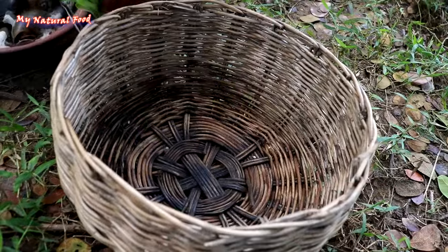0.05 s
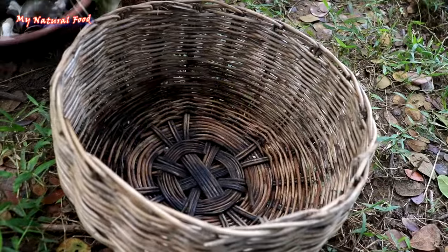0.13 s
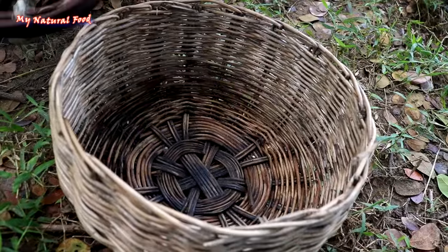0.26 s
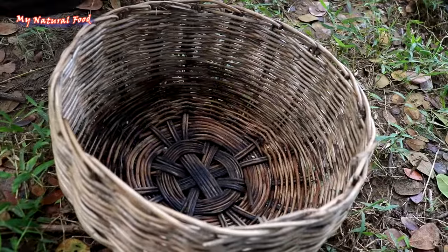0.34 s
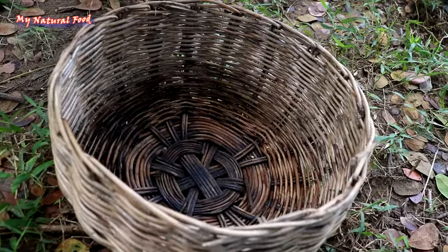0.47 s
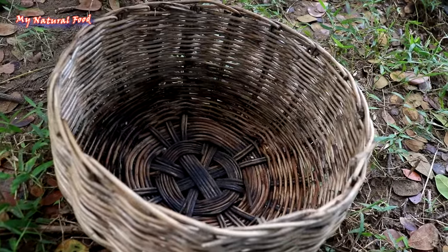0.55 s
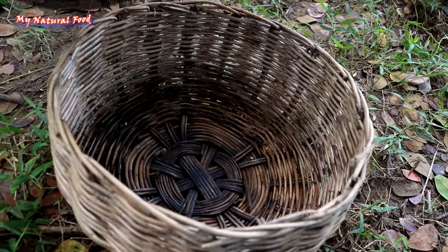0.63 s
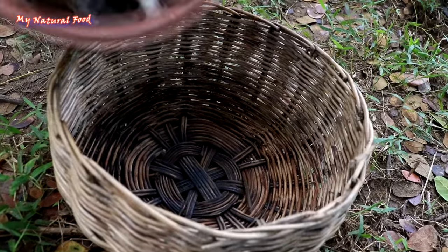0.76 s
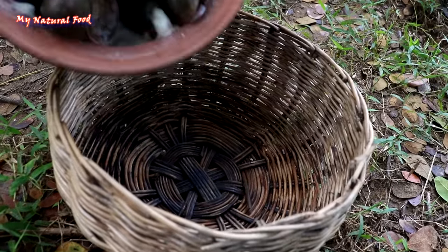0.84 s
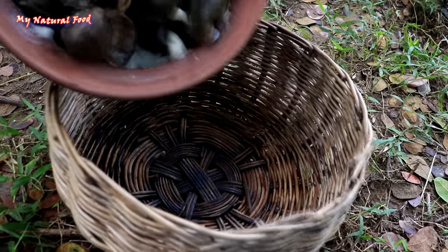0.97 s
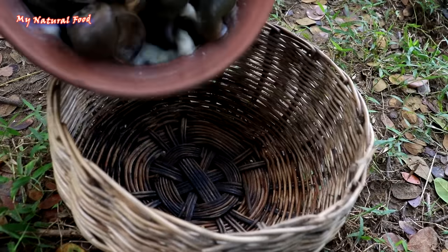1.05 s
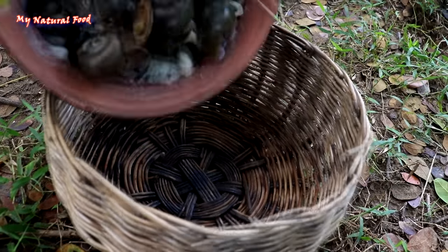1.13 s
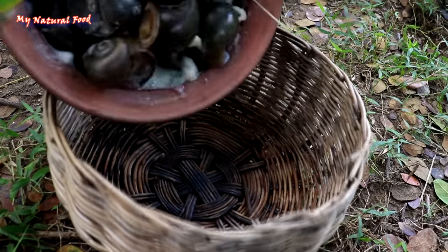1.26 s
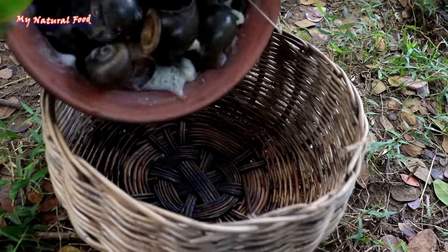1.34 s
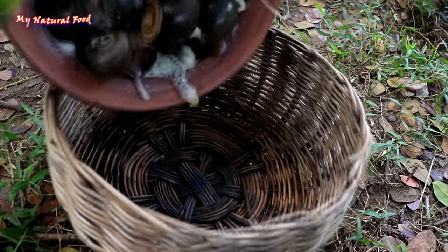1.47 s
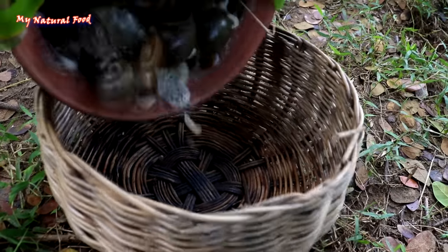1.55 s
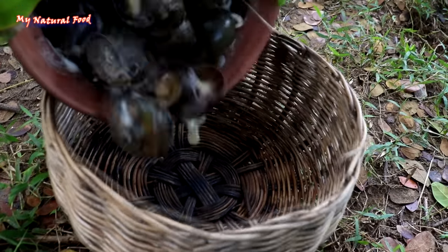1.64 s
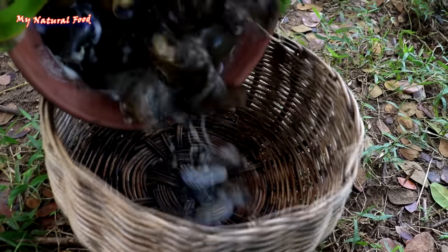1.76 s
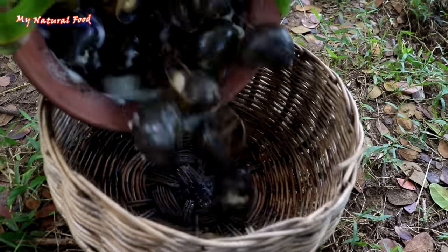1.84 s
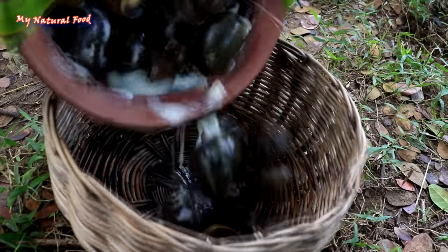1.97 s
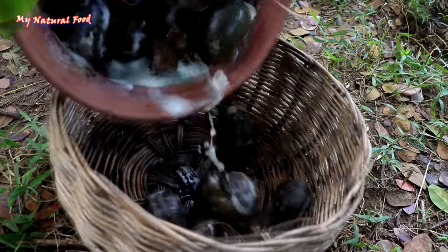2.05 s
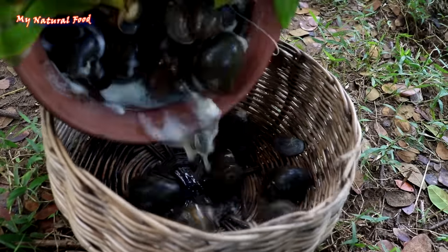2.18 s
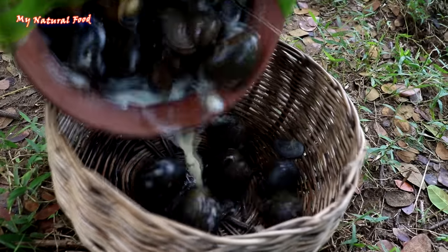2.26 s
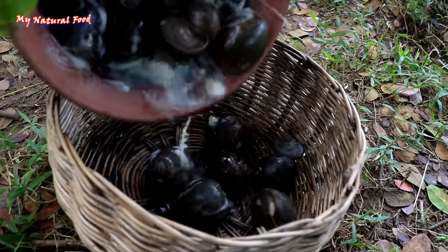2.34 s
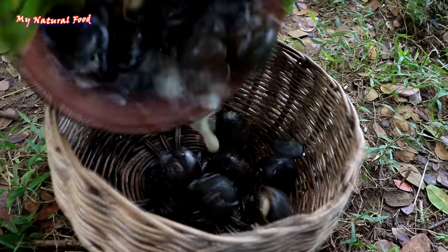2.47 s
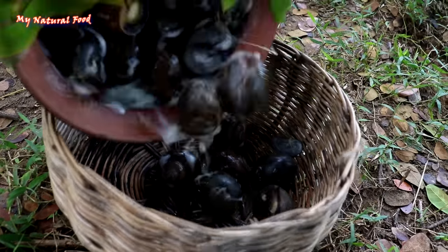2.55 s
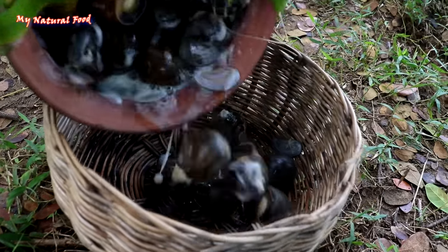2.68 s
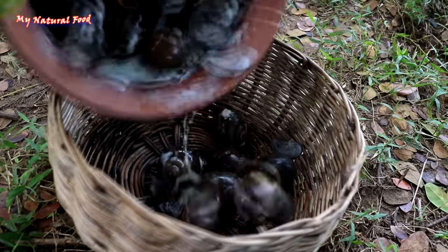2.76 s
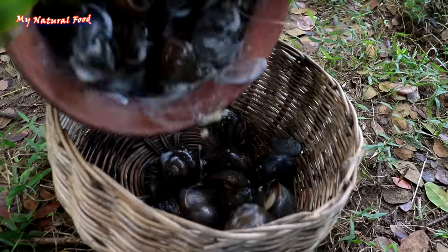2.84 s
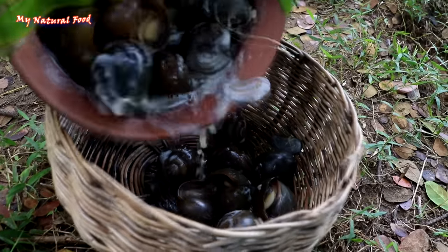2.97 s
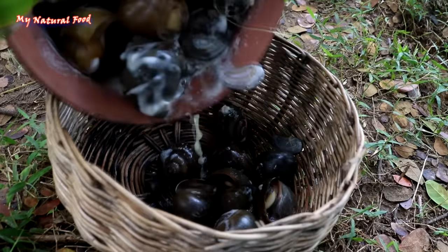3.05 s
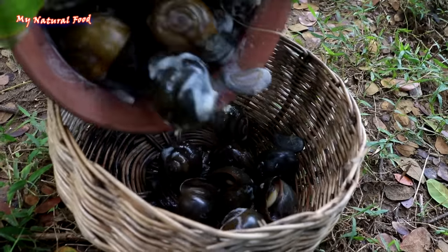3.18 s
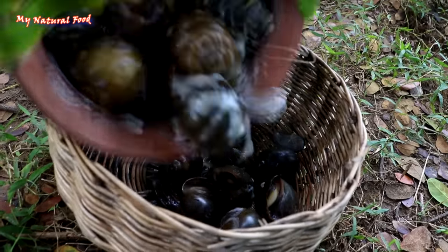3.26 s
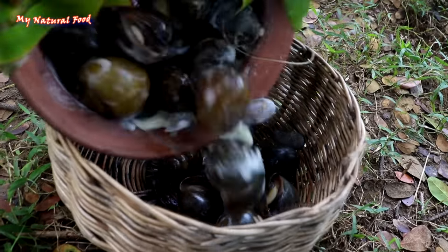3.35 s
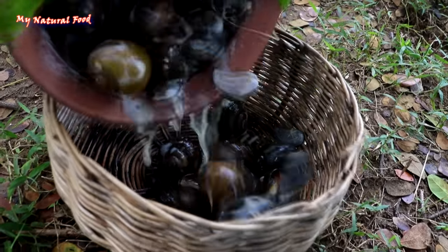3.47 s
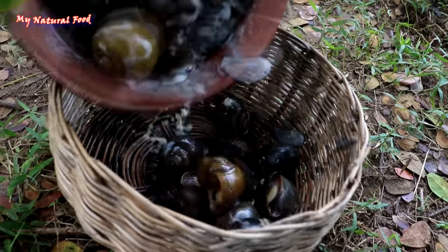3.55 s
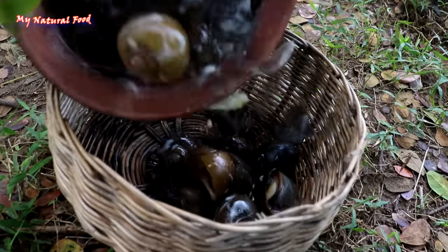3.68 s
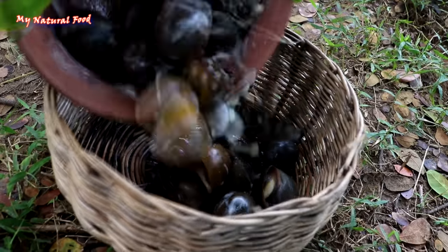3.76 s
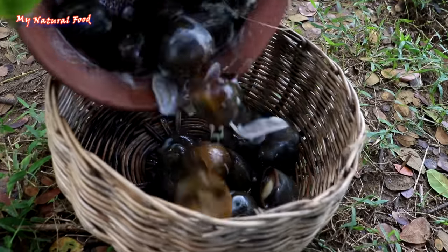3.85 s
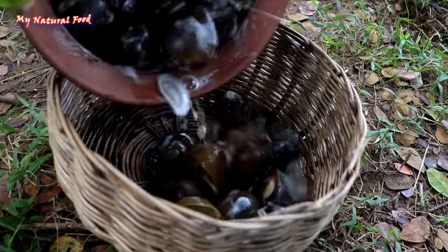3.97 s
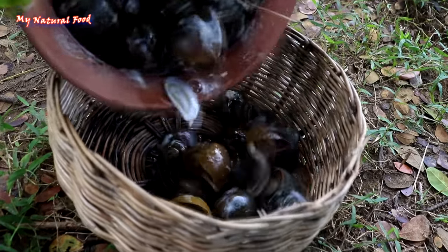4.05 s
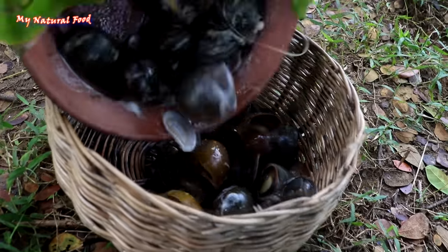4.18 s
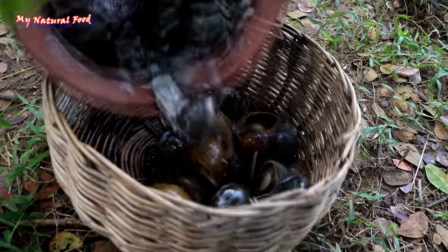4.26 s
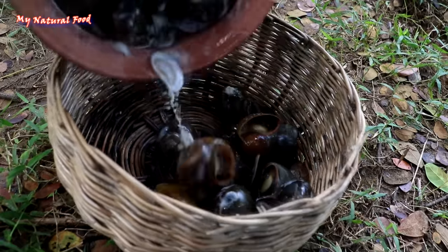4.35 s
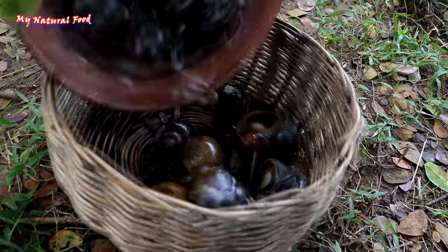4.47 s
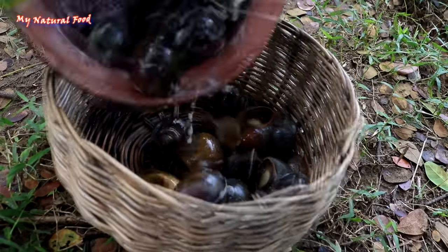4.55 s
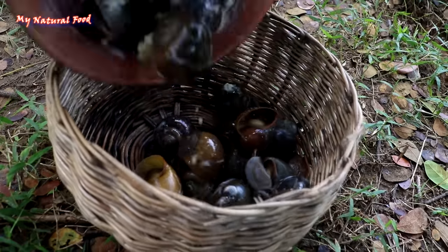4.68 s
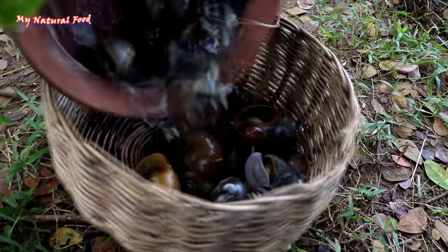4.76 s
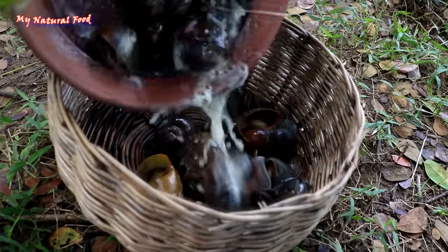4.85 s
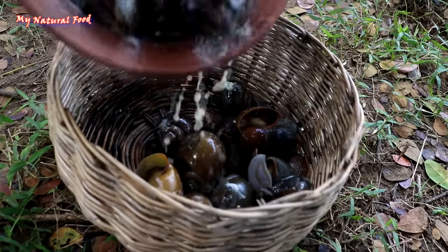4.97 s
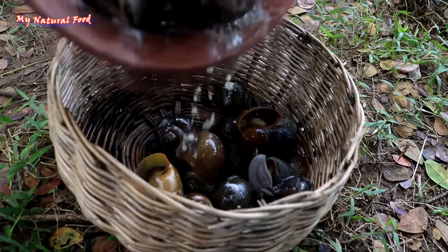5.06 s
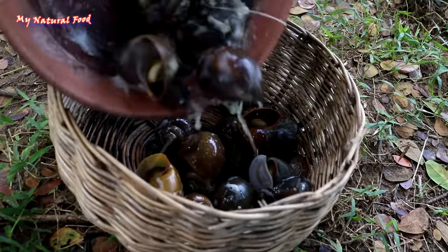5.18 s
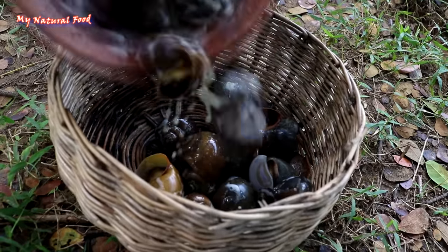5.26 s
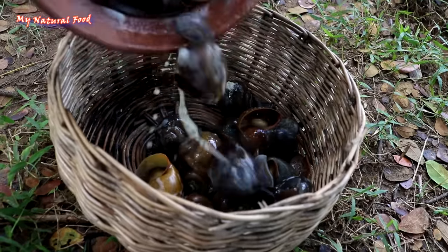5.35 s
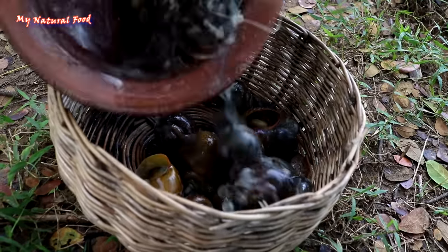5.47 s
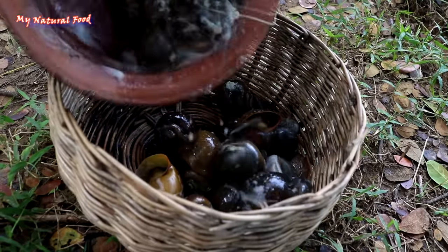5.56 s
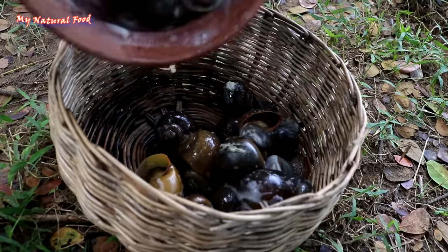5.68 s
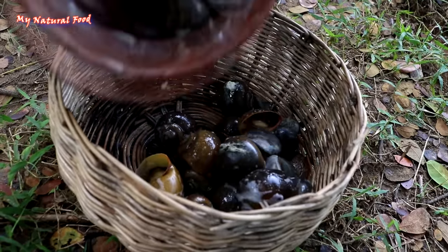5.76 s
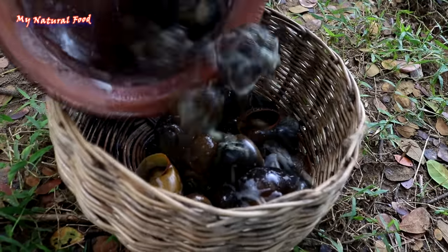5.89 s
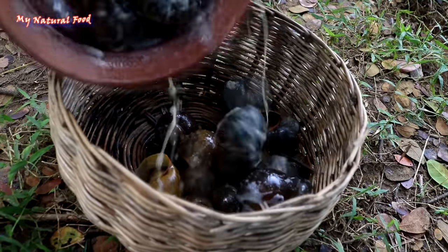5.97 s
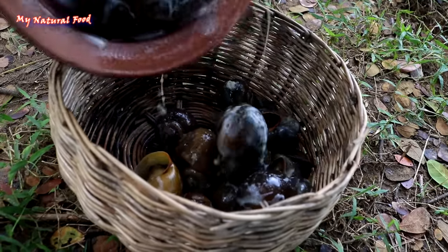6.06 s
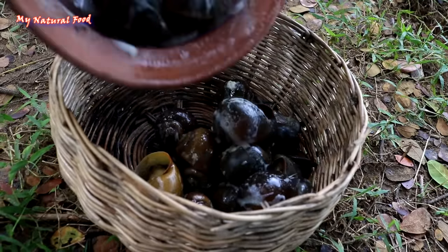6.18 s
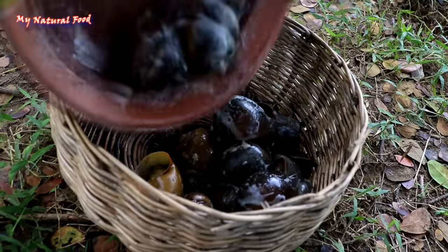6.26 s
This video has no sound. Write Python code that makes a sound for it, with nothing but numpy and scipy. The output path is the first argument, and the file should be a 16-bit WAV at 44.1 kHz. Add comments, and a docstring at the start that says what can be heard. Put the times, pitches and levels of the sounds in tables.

```python
"""Snail shells poured into a basket

Wet shells slide out of a tilted clay pot and drop into a wicker basket in a garden. Each knock is a
cluster of short shell modes with a hollow thud and a sharp crack; knocks on the pot ring its modes.
Small shells and water drops patter between them, over garden air, a faint chirr and wind on the
microphone. The loudest knocks overload."""
import sys
import numpy as np
from scipy import signal
from scipy.fft import rfft, irfft
from scipy.io import wavfile

SR = 44100
rng = np.random.default_rng(int(sys.argv[2]) if len(sys.argv) > 2 else 0)


def generate_wav(signal):
    """Clip the signal to [-1, 1] and save it as 16-bit WAV at the path in sys.argv[1]."""
    frames = np.transpose(np.atleast_2d(signal))
    scaled = np.clip(frames, -1, 1) * 32767
    pcm = np.round(scaled).astype(np.int16)
    wavfile.write(sys.argv[1], SR, pcm)


N = 278712

# The distinct shell knocks: t/s, peak/dB, pitch/Hz, thud/dB, crack/dB (the last two relative)
KNOCKS = [(0.684,-21,3740,-11,-16),(0.7088,-27,2220,2,-28),(0.7493,-24,990,-1,-18),(1.531,-25,1750,-20,-22),(1.5452,-20,1650,-2,-17),
          (1.5613,-25,2250,3,-9),(1.5979,-13.5,1230,-5,-20),(1.615,-17,1520,-16,-25),(1.6242,-9.5,3570,-16,-16),(1.6295,-11.5,1620,-8,-15.5),
          (1.639,-19,3400,-14,-15),(1.6543,-8,1950,-17,-7.5),(1.667,-17,1000,-23,-20.5),(1.6771,-12.5,2600,-19,-32),(1.702,-15,2720,-17,-21),
          (1.7088,-11.5,1720,-3,-10),(1.7285,-7.5,3500,-20,-5.5),(1.733,-14,4410,-33,-2),(1.7539,-16.5,820,-7,-3),(1.764,-5.5,1600,-12,-16),
          (1.775,-12.5,5030,-22,-9),(1.7883,-11.5,3320,-11,-20),(1.8048,-16.5,5460,-3,-3),(1.8158,-9.5,2110,-1,-18),(1.8292,-17,3400,-11,-4),
          (1.8686,-13.5,1050,10.5,-29),(1.8917,-18.5,1880,3,-7),(1.9225,-24,3250,-26,-3.5),(1.9513,-25,3570,-29,-39),(1.9664,-24,2900,2,-5),
          (1.9807,-13,3260,-46,-29),(2.0052,-8.5,2110,-16,-14),(2.0108,-8.5,4640,-28,-10),(2.0411,-11.5,4430,-36,-24),(2.0532,-11.5,4400,-28,7),
          (2.0615,-16,2980,-26,-1),(2.068,-9.5,4610,-48,-26),(2.07,-4.5,3110,-43,-3),(2.1278,-17,3320,-2,-17),(2.1573,-11,3430,-8,-26),
          (2.188,-21.5,2030,-24,-5),(2.2197,-21.5,1810,-6,-35),(2.276,-15,2350,-4,-32),(2.2977,-12,4100,-15,-25),(2.3353,-22,1100,-9,-26),
          (2.3559,-22,3870,-2,0.5),(2.498,-15,1100,-3,-25),(2.513,-14,2160,-5,-34),(2.526,-7.5,2110,-10,-11.5),(2.532,-12,1120,-24,-25),
          (2.5496,-3,3560,-12.5,-18),(2.5597,-9,1140,-21,-14),(2.5762,-14.5,3400,-9,-31),(2.589,-13,1730,-5,-35),(2.615,-18.5,5320,-7,-13),
          (2.65,-24.5,2420,-2,-12),(2.6982,-5.5,3230,-33,-12.5),(2.7269,-18.5,3100,-7,-6),(2.7792,-7,2900,-9,-14),(2.8128,-20,3700,-3,-6.5),
          (2.8404,-21,2880,-11,-31),(2.8795,-21,5050,-5,-8),(2.8957,-8,3240,-31.5,-4.5),(2.905,-2,3330,-23,-6.5),(2.9171,-10.5,1760,-25,-19),
          (2.9243,0.5,2760,-10.5,-41),(2.9377,-14,2490,5,-31),(2.948,-8.5,1420,2.5,-25),(2.968,-14,2430,-5,-32),(3.0109,-11,1190,-2,-20),
          (3.0417,-19,840,-7,-16),(3.0614,-16.5,1830,-4,-26),(3.0871,-19.5,2800,-5,-32),(3.129,-20,1970,-6,-20),(3.2152,-17.5,1650,-1,-28),
          (3.3445,-14.5,1700,-5,-10.5),(3.3858,-5,2740,-8,-35),(3.4049,-14.5,1180,-14,-26),(3.4236,-8,5200,-15,-10),(3.447,-13,1550,-12,-14),
          (3.463,-12.5,2250,-22,-16),(3.4918,-16,2000,-24,-8),(3.5026,-13,2050,-16,-4),(3.51,-18,2000,-21,-10),(3.524,-14,3250,-13,-20),
          (3.5564,-11.5,2270,-31,-10),(3.5878,-12,2100,-20,-4),(3.6483,-28,3940,-7,-8),(3.6995,-26.5,2420,-7,-10),(3.721,-12.5,1680,-2,-24),
          (3.7451,1.5,2740,-4,-9),(3.7513,-7,1530,-12,-12),(3.7609,4.5,1730,-25,-6),(3.7708,-6,1170,-25,-2.5),(3.7858,-4.5,2730,-13.5,-16),
          (3.8037,-1,1900,-12,-26),(3.8261,-14,3780,9,-4),(3.8475,-18,4870,-22,-9),(3.8745,-5,2410,2.5,-45),(3.9006,-9.5,2720,-8,-8.5),
          (3.9215,-8.5,2690,-26,-15),(3.929,-14,1710,-6,-1.5),(3.9594,-9.5,2300,-12,-6.5),(3.9762,-14.5,3210,-19,-19),(3.992,-23,3780,-26,-3),
          (4.014,-25,2780,-20,-4),(4.0247,-21,1300,2,6),(4.036,-10.5,3260,-16,-4.5),(4.0388,-10.5,2070,-23,-17),(4.075,-11,3320,-30,-3.5),
          (4.0833,-16.5,1750,1,-17),(4.189,-21,2660,-18,-33),(4.197,-19,1300,10,-30),(4.2378,-9.5,1230,-6,-27),(4.2937,-18,1200,-26,-54),
          (4.3541,-8,3960,-5.5,-14),(4.4106,-7,3380,-17,-12.5),(4.4426,-12.5,1890,-35,-20),(4.461,-11.5,2220,-29,-22),(4.51,-4,1970,-6.5,-29),
          (4.5315,-9,2600,-22,-31),(4.542,-4.5,1830,-6,-26),(4.5451,-3,2530,-16,-38),(4.5491,-3.5,3500,3,-9),(4.5567,2,1600,-22,-43),
          (4.5617,-1,1860,1,-28),(4.5908,-8.5,2480,-7,-31),(4.6047,-11,1730,-9,-24),(4.612,-16,1760,-3,-11),(4.62,-20,3040,-8,-19),
          (4.6298,-21,1230,5,-0.5),(4.6507,-17.5,4350,-25,-18),(4.7027,-22.5,2510,-5,-12),(4.7371,-7,3790,-12.5,-26),(4.744,-10.5,1210,-16,-24),
          (4.7575,-7.5,2530,-12,-43),(4.771,1.5,1120,-4.5,-48),(4.7964,2,2580,-15,-25),(4.828,-30,2350,-7,-12),(4.931,-21.5,3030,-3,-1),
          (4.9429,-6,3620,-18,-14),(5.1482,-8.5,1690,-12,-22),(5.1633,-11.5,1640,-8,-30),(5.1692,-9.5,2560,-13,-34),(5.1784,-17,3280,-13,-14),
          (5.1821,-3.5,2450,-21,-32),(5.186,-10.5,3460,-28,-29),(5.1927,4.5,1147,-10.5,-39),(5.204,-3,3350,-12,-20),(5.241,-14.5,2320,-4,-7),
          (5.2636,-12,2540,-9,-14.5),(5.3833,1,1550,-7.5,-19.5),(5.395,-13.5,1620,-31,-27),(5.4305,-21,1850,-23,-46),(5.4628,-17.5,3620,-5,-25),
          (5.483,-7,3430,-15,-26),(5.4947,-7,1680,-31,-11),(5.4998,-9,1150,-4,-9.5),(5.517,-2,2770,-48,-31),(5.5464,-10.5,2800,-13,-13),
          (5.5869,-24,5900,-16,-4),(5.6007,-25,2620,-19,-6),(5.6182,-28,1860,-15,-40),(5.852,-10.5,4260,-5,-14.5),(5.8781,-6.5,1150,-6,-9),
          (5.8846,-8,1680,-26,-24),(5.89,-2.5,2420,-14,-4),(5.9007,-4,2390,-2,-9),(5.911,-5.5,2100,-5,-13),(5.9285,-0.5,1760,7,-36),
          (5.9671,-18.5,3500,-8,-11),(5.9848,-8.5,3500,-30,-46),(6.0137,-5.5,1900,-18,-10.5),(6.0237,-7.5,2000,-30,-14),(6.0345,-3.5,3800,-30,-34),
          (6.0397,-3,3170,-32,-44),(6.0863,-22,1940,-20,-32),(6.1196,-20.5,2640,-24,-44.5),(6.162,-25,2000,-9,-22),(6.2426,-22.5,2010,-19,-22),
          (6.292,-16,1290,1.5,-2.5)]


def shells(hits, count=26):
    """A struck shell rings three modes near its pitch and a spread of others from thud to treble."""
    t60_s, damping_slope = .0135, .2   # typical ring time at 2 kHz; higher modes die sooner
    free_below_db, free_ring_per_db = -21.5, .1
    onsets, peak_db, pitch, thud_db, crack_db = hits
    tuning, strength, decay = np.hsplit(rng.random((len(onsets), 3 * count)), 3)
    hz = 500 * (8000 / 500) ** ((np.arange(-3, count - 3) + tuning) / (count - 3))
    hz[:, :3] = pitch * (1 + .14 * (tuning[:, :3] - .5) * [0, 2, -2])
    # Mode levels slope from the pitch down to the thud and up to the crack.
    octaves = np.log2(hz / pitch)
    low_db = np.clip(-octaves / np.maximum(np.log2(pitch / 700), .3), 0, 1) * thud_db
    high_db = np.clip(octaves / np.maximum(np.log2(9000 / pitch), .3), 0, 1) * (crack_db + 4.5)
    level_db = low_db + high_db - 4 + 10 * (strength - .5)
    level_db[:, :3] = [0, -3, -3]
    t60 = t60_s * (2000 / hz) ** damping_slope * (.7 + .6 * decay)
    # A shell struck free of the heap hardly thuds and rings longer on its pitch.
    t60[:, :1] *= 1 + free_ring_per_db * np.maximum(free_below_db - thud_db, 0)
    t = np.arange(1200) / SR
    modes = np.sin(2 * np.pi * hz[..., None] * t) * from_db(level_db[..., None] - 60 * t / t60[..., None])
    attack = 1 - np.exp(-t / .00036)   # the contact lasts a moment
    knocks = modes.sum(axis=1) * attack
    return place(onsets[:, 0], from_db(peak_db) * knocks / abs(knocks).max(axis=1, keepdims=True))


def cracks(hits, t60_s=.0093):
    """Each hard contact throws a short burst of bright noise."""
    onsets, peak_db, _, _, crack_db = hits
    t = np.arange(1200) / SR
    envelopes = from_db(peak_db + crack_db - 2 - 60 * t / t60_s)
    bursts = rng.standard_normal(envelopes.shape) * envelopes
    bright = signal.butter(2, [5500, 14500], "band", fs=SR, output="sos")
    return signal.sosfilt(bright, place(onsets[:, 0], bursts) + 1e-18)


def knocks_and_rebounds(rebound_db=-23, spread_db=10):
    """Every knock is followed 5-28 ms later by a weaker rebound against some other shell."""
    knocks = np.transpose(KNOCKS)
    lag, strength, tuning = rng.random((len(KNOCKS), 3)).T
    rebounds = knocks.copy()
    rebounds[0] = np.minimum(knocks[0] + .005 + .023 * lag, N / SR)
    rebounds[1] += rebound_db + spread_db * (strength - .5)
    rebounds[2] = 900 * (5000 / 900) ** tuning
    return np.hstack([knocks, rebounds])[:, :, None]


def clay_pot(falloff_db_per_octave=21.6):
    """A shell hits the pot wall and rings its modes, favouring those near the one it strikes best."""
    # Modes of the pot: f/Hz, gain/dB, t60/s
    modes = [(735, -1, 0.059), (1114, -4, 0.11), (1665, 3.5, 0.067), (2650, 11.5, 0.039), (3500, 7, 0.061),
             (4740, 18.5, 0.015)]
    # Blows on the wall: t/s, strength/dB, f/Hz of the mode struck best
    blows = [(1.6539, -22, 735), (1.7285, -23.5, 3500), (1.7607, -17.5, 735), (1.79, -26, 3500),
             (2.5595, -18, 735), (2.9192, -15.5, 1665), (3.3866, -19, 735), (3.7633, -19, 1114),
             (3.8255, -23, 735), (4.204, -29.5, 1665), (4.2378, -19, 1114), (4.2953, -31, 1665),
             (4.511, -15, 1114), (4.5563, -19, 2650), (4.6289, -29, 1114), (4.7705, -14, 735),
             (4.772, -12, 2650), (4.7954, -12.5, 735), (5.147, -18, 1114), (5.1873, -21, 1114),
             (5.19, -11, 1665), (5.262, -27.5, 1114), (5.4955, -12.5, 1114), (5.5176, -22.5, 3500),
             (5.89, -8, 1114), (5.9294, -6, 1665)]
    onsets, blow_db, best_hz = np.transpose(blows)
    out = np.zeros(N)
    for hz, gain_db, t60 in modes:
        drive_db = blow_db + gain_db - falloff_db_per_octave * abs(np.log2(hz / best_hz))
        out += ring(impulses(onsets, drive_db), hz, t60)
    return out


def patter(median_per_s=5000, count=24):
    """Clumps of tiny contacts ring a few cycles each, swelling with the pour and after every knock."""
    # Swell of the pour: t/s, level/dB
    pour = [(.58, -58), (.68, -53), (.76, -52), (.82, -56.5), (1.46, -60), (1.62, -40.5), (1.83, -36.5),
            (1.93, -52), (2.3, -47), (2.42, -58), (2.9, -51), (3.1, -47.5), (3.3, -48), (3.5, -39.5),
            (3.66, -51), (4.14, -50.5), (4.6, -41.5), (4.85, -64), (5.66, -50.5), (5.9, -46), (6.32, -50)]
    # Tone of the small contacts: f/Hz, gain/dB
    colour = [(400, -9), (1200, -0.5), (3200, 18), (6000, -7), (10000, -37), (16000, -30)]
    sizes = from_db(4 * np.minimum(rng.exponential(1, N), 4)) * rng.choice([-1, 1], N)
    touches = rng.random(N) < median_per_s * from_db(4 * drift(150)) / SR
    voice = rng.integers(0, count, N)
    rings = sum(from_db(at_hz(colour, hz)) * ring(sizes * touches * (voice == k), hz, 6 / hz + .00051)
                for k, hz in enumerate(np.geomspace(500, 15500, count)))
    jostle = from_db(-14) * settling(settle_s=.0051)
    slide = from_db(-41.5) * settling(settle_s=.031)
    return (from_db(in_time(pour)) + jostle + slide) * rms_one(rings)


def settling(settle_s):
    """Envelope of the heap's motion: every knock stirs it, and it comes to rest."""
    onsets, peak_db = np.transpose(KNOCKS)[:2]
    return signal.lfilter([1], [1, -np.exp(-1 / (settle_s * SR))], impulses(onsets, peak_db))


def drips(per_s=45, t60_cycles=24, count=14):
    """Water drips on the heap at random, each drop a short pitched ping."""
    # Strength of the drops: t/s, typical peak/dB
    levels = [(1.5, -60), (1.7, -39.5), (3.2, -34.5), (5.7, -36.5), (6.32, -35.5)]
    falls = rng.random(N) < per_s / SR
    drops = falls * from_db(in_time(levels) + 5.1 * rng.standard_normal(N))
    voice = rng.integers(0, count, N)
    pitches = np.geomspace(1300, 5500, count)
    return sum(ring(drops * (voice == k), hz, t60_cycles / hz) for k, hz in enumerate(pitches))


def basket(x, t60_s=.021, count=120):
    """The basket wall and the ground give back dull, close echoes."""
    echoes = np.zeros(int(.03 * SR))
    lags = rng.integers(60, len(echoes), size=count)
    echoes[lags] = rng.choice([-1, 1], size=count) * from_db(-60 * lags / SR / t60_s)
    dull = signal.butter(1, 4000, fs=SR, output="sos")
    return signal.sosfilt(dull, signal.fftconvolve(x, echoes)[:N])


def wind():
    """Lumpy rumble on the microphone; a buffet swells it around one push and pull of pressure."""
    # Rise and fall of the breeze: t/s, level/dB
    breeze = [(0.0, -42), (0.21, -55.5), (1.37, -47), (1.53, -38), (2.8, -51.5), (3.36, -50), (3.92, -33),
              (5.67, -40), (6.32, -32.5)]
    # Spectrum of the rumble: f/Hz, relative density/dB
    colour = [(8.8, -41), (15, 9), (32, -2), (51, 0.5), (88, -5), (172, -17), (250, -26.5), (320, -57),
              (550, -120)]
    # Short gust bumps: t/s, strength/dB
    buffets = [(0.589, -41), (0.945, -30), (1.399, -19.5), (1.652, -30.5), (2.01, -35), (2.117, -41),
               (2.451, -37.5), (3.277, -38), (3.728, -31), (3.875, -31), (4.004, -28), (4.576, -29.5),
               (4.947, -28), (5.049, -20.5), (5.776, -24.5), (6.091, -23)]
    onsets, buffet_db = np.transpose(buffets)[:, :, None]
    u = (np.arange(2200) / SR - .024) / .004   # time from the buffet's centre, in 4 ms widths
    pushes = place(onsets[:, 0], from_db(buffet_db + .5) * u * np.exp(-u ** 2 / 2))
    swells = place(onsets[:, 0], from_db(buffet_db - 2) * np.exp(-(u / 2) ** 2 / 2))
    gusting = from_db(in_time(breeze) + 4.6 * drift(13))
    return (gusting + swells) * coloured(colour) + pushes


def garden(level_db=-47):
    """A soft, gently wavering bed of outdoor noise."""
    # Spectrum of the garden air: f/Hz, relative density/dB
    colour = [(90, -35), (180, -5), (330, 2.5), (550, -4), (900, -5), (1800, -13.5), (3200, -13.5),
              (5500, -24.5), (9000, -29.5), (15900, -35.5)]
    return from_db(level_db + drift(2.86)) * coloured(colour)


def chirr():
    """A faint, far band of hiss near 5 kHz, perhaps insects, that soon sinks lower."""
    # Fade of the chirr: t/s, level/dB
    fade = [(0.0, -54), (.3, -67), (.5, -65.5)]
    # Its spectrum: f/Hz, relative density/dB
    colour = [(3800, -24), (5100, 3), (7300, -20), (8600, -39.5)]
    return from_db(in_time(fade)) * coloured(colour)


def from_db(db):
    """Decibels to gain."""
    return 10 ** (np.asarray(db) / 20)


def rms_one(x):
    """Scale to rms 1."""
    return x / np.sqrt(np.mean(x ** 2) + 1e-20)


def in_time(rows):
    """A (t/s, value) curve at every sample."""
    return np.interp(np.arange(N) / SR, *np.transpose(rows))


def at_hz(spectrum, hz):
    """A (f/Hz, level/dB) curve read on a log-frequency axis."""
    points_hz, level_db = np.transpose(spectrum)
    return np.interp(np.log(hz), np.log(points_hz), level_db)


def coloured(spectrum):
    """Noise of the given spectrum, rms 1."""
    hz = np.maximum(np.arange(N // 2 + 1) * SR / N, 1)
    return rms_one(irfft(rfft(rng.standard_normal(N)) * from_db(at_hz(spectrum, hz)), N))


def drift(per_s):
    """A wandering line through random points of spread 1."""
    points = rng.standard_normal(int(N / SR * per_s) + 2)
    return np.interp(np.arange(N) / SR * per_s, np.arange(len(points)), points)


def impulses(onsets, level_db):
    """One-sample clicks at the given times and levels."""
    clicks = np.zeros(N)
    clicks[np.round(onsets * SR).astype(int)] = from_db(level_db)
    return clicks


def ring(clicks, hz, t60):
    """A resonator: each click starts a decaying sine."""
    r, w = from_db(-60 / (t60 * SR)), 2 * np.pi * hz / SR
    return signal.lfilter([0, np.sin(w)], [1, -2 * r * np.cos(w), r * r], clicks + 1e-18)


def place(onsets, sounds):
    """Lay each row of sounds at its time."""
    out = np.zeros(N + sounds.shape[1])
    for onset, sound in zip(onsets, sounds):
        start = round(onset * SR)
        out[start:start + len(sound)] += sound
    return out[:N]


def scene():
    """Shells, pot, patter and drips with their basket echoes, over wind and garden, in mono."""
    hits = knocks_and_rebounds()
    pour = shells(hits) + cracks(hits) + clay_pot() + patter() + drips()
    low_cut = signal.butter(3, 500, "high", fs=SR, output="sos")   # small bodies radiate no bass
    pour = signal.sosfilt(low_cut, pour)
    ambience = garden() + chirr()
    echoes = from_db(-17) * basket(pour)
    return (pour + echoes + wind() + ambience)[None]


def record(dry, cutoff_hz=16100):
    """The loudest knocks clip, then a steep low-pass cuts the top."""
    high_cut = signal.ellip(12, .5, 75, cutoff_hz, fs=SR, output="sos")
    return signal.sosfilt(high_cut, np.clip(dry, -.98, .98))


dry = scene()
out = record(dry)
generate_wav(out)
```